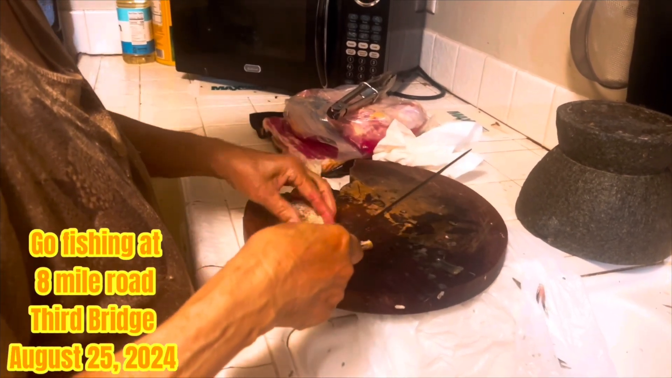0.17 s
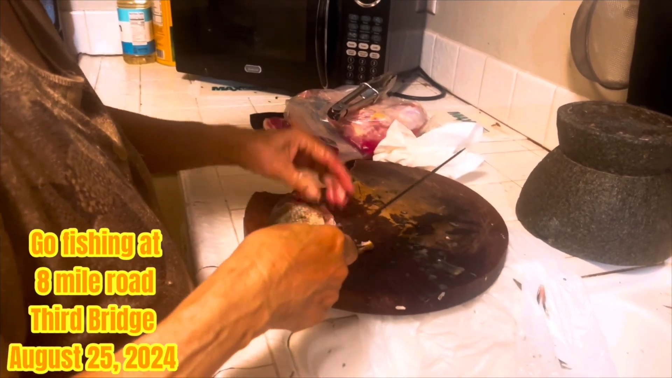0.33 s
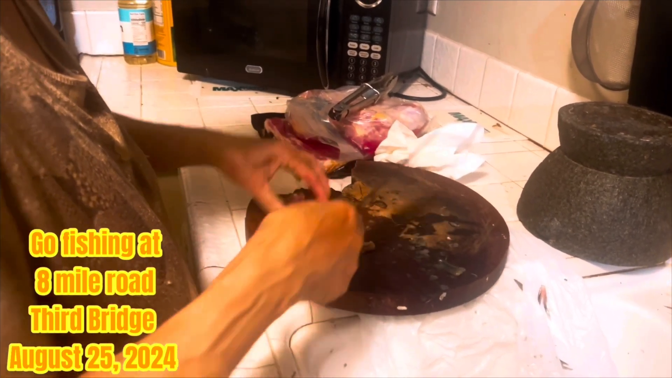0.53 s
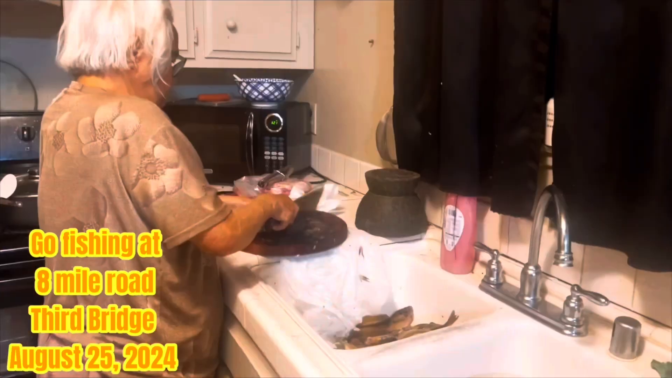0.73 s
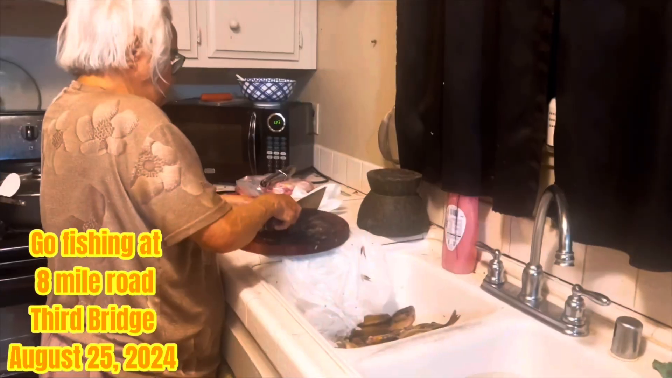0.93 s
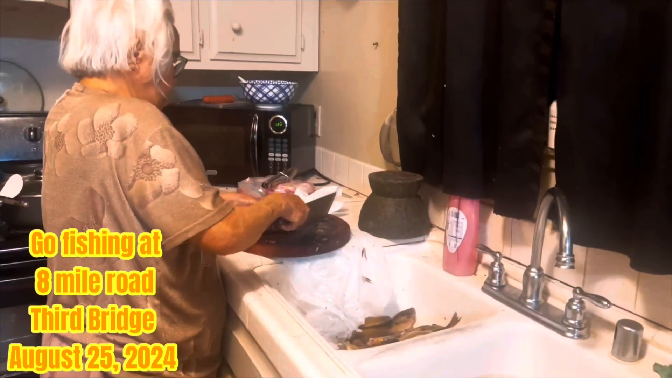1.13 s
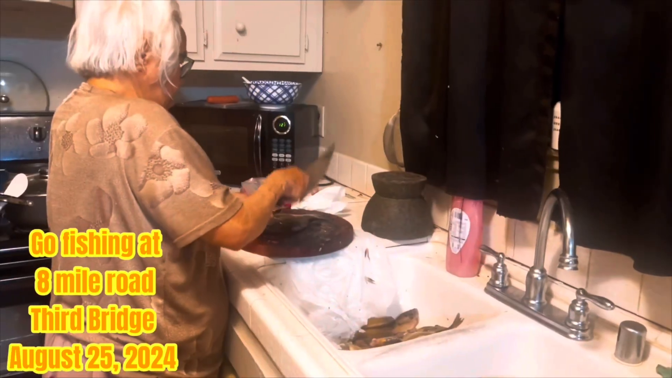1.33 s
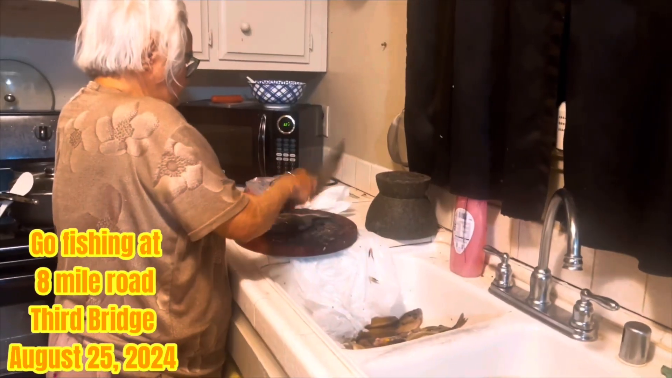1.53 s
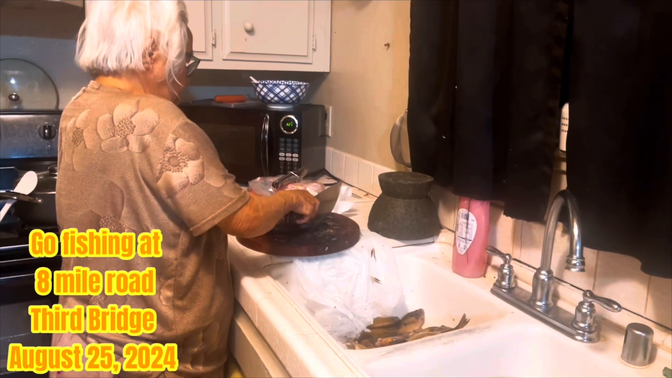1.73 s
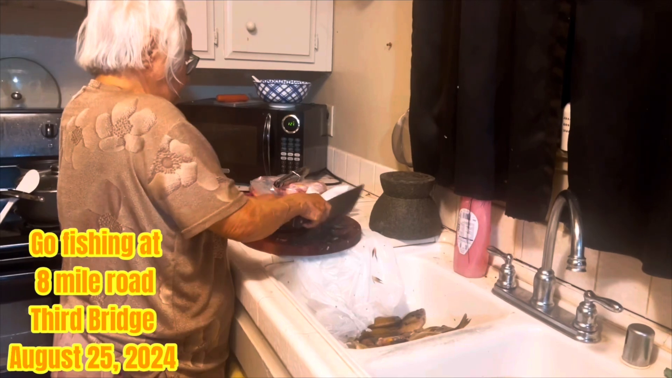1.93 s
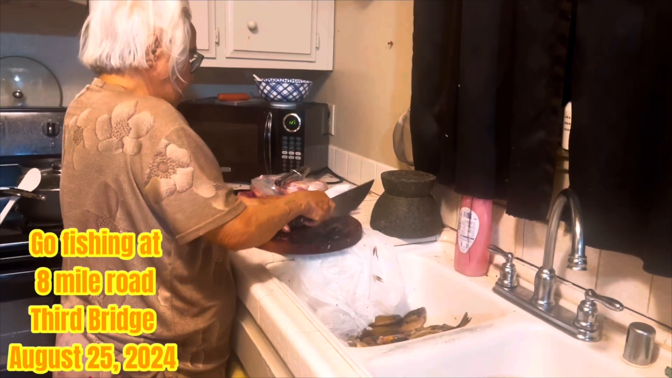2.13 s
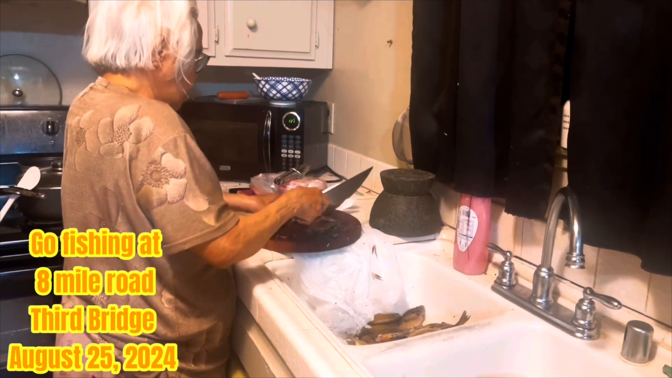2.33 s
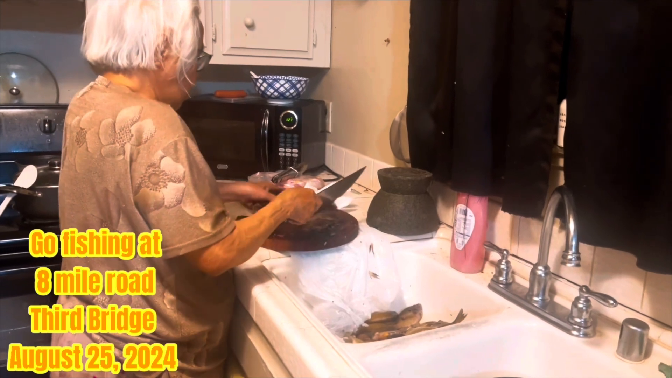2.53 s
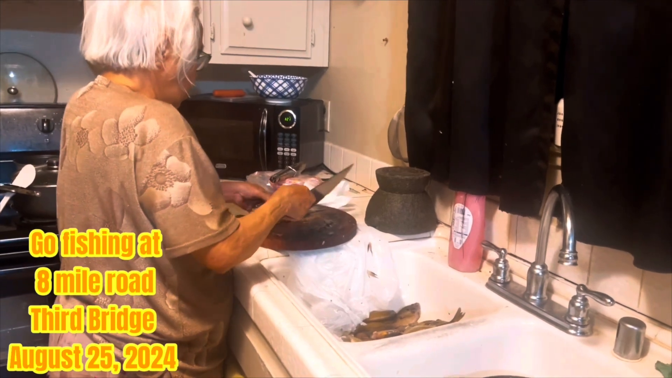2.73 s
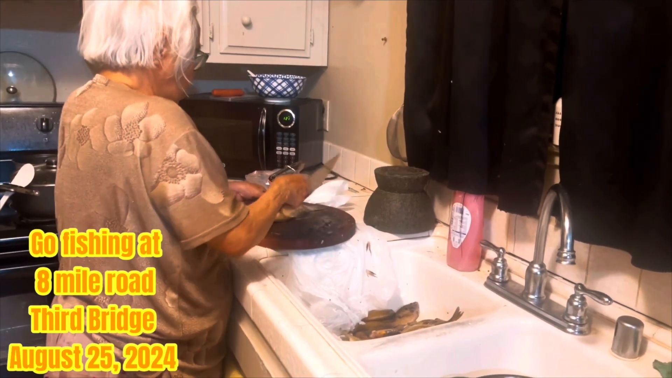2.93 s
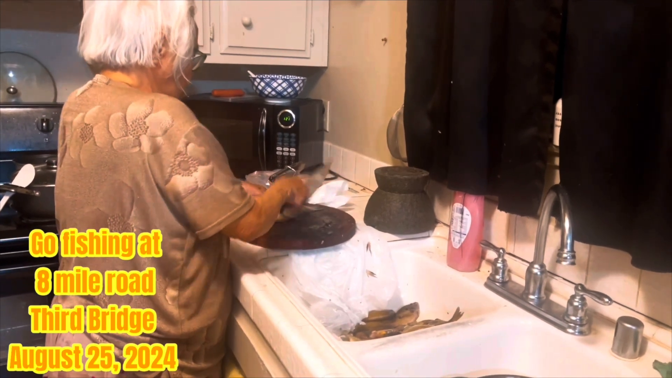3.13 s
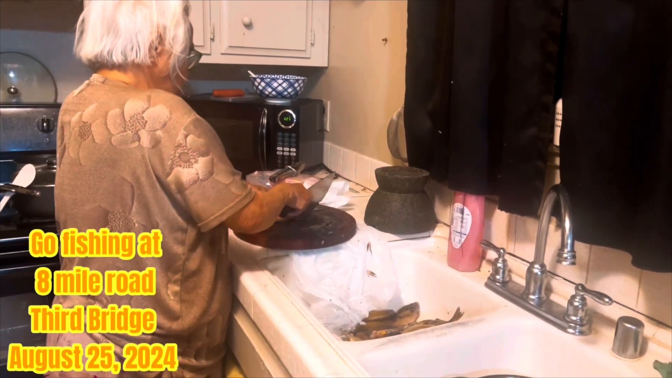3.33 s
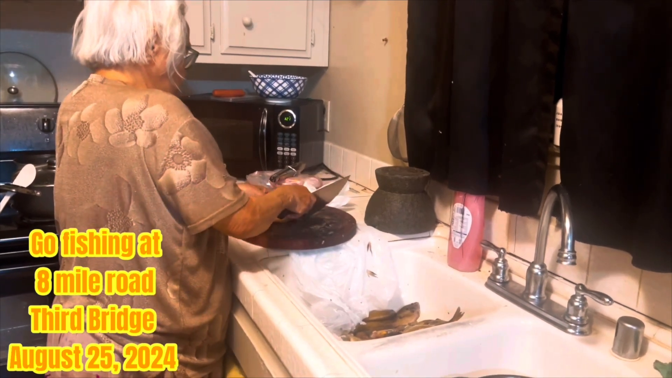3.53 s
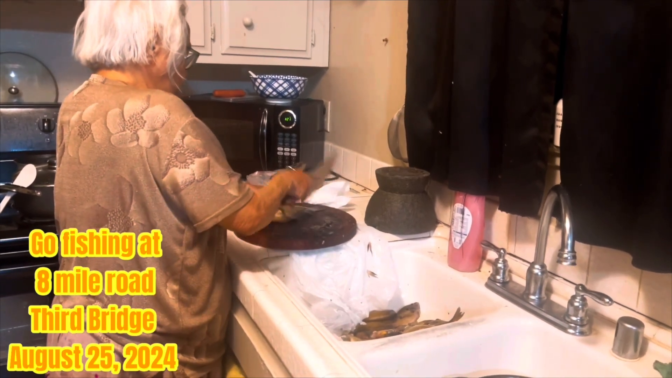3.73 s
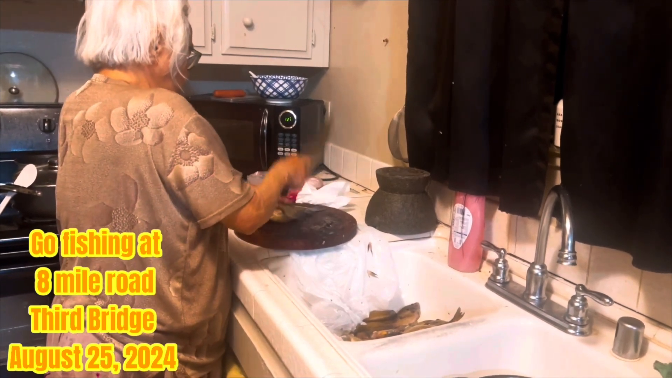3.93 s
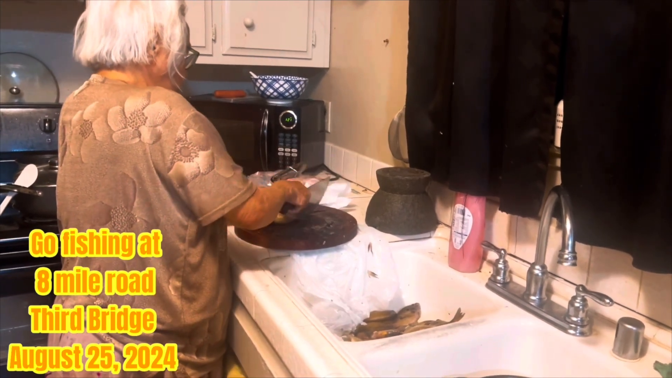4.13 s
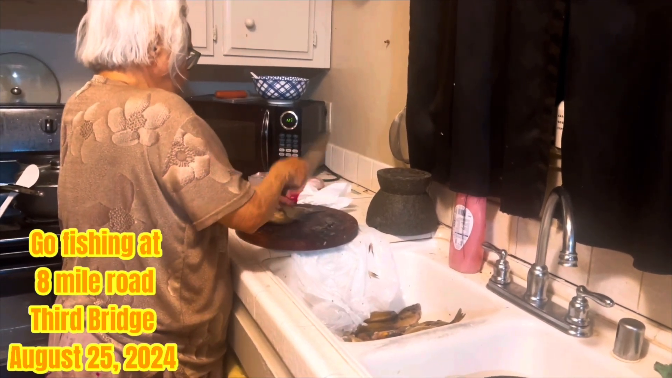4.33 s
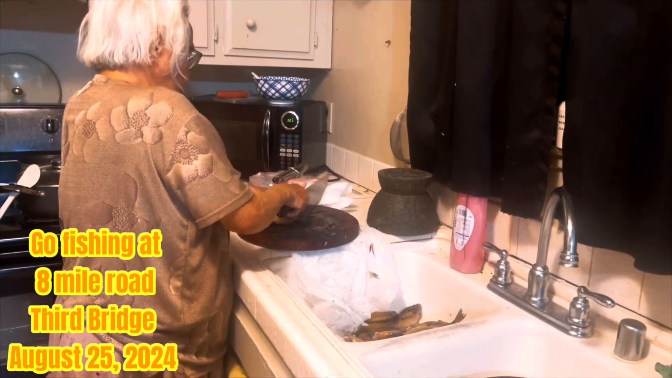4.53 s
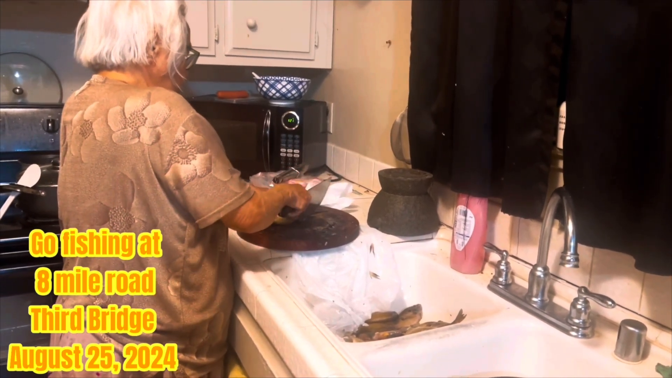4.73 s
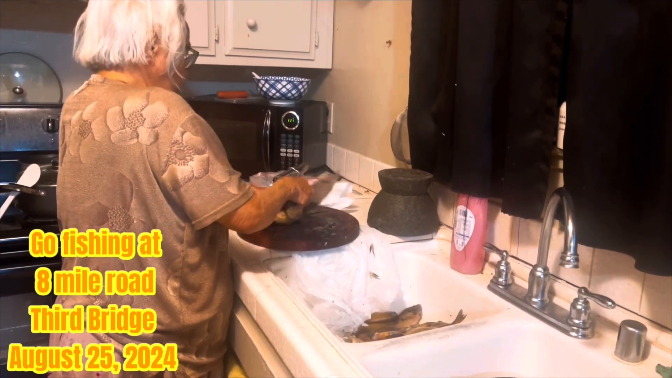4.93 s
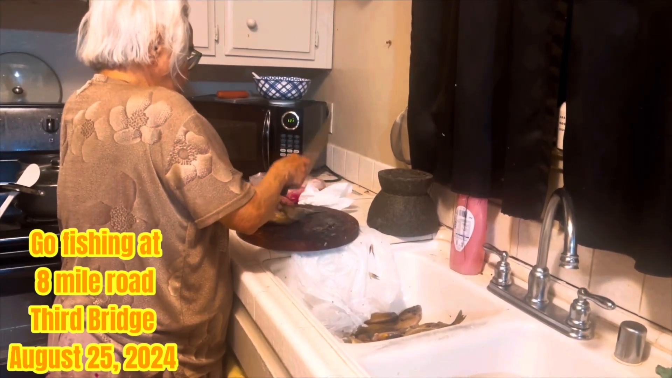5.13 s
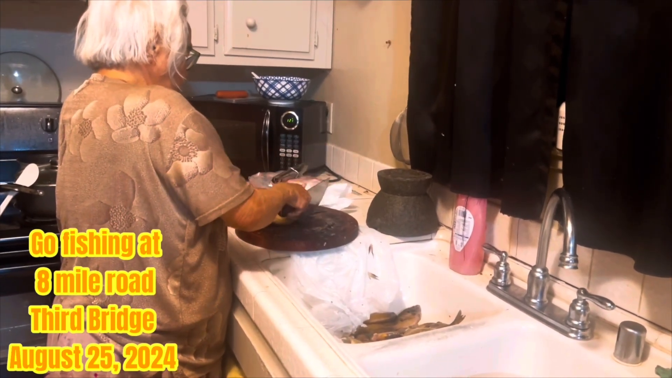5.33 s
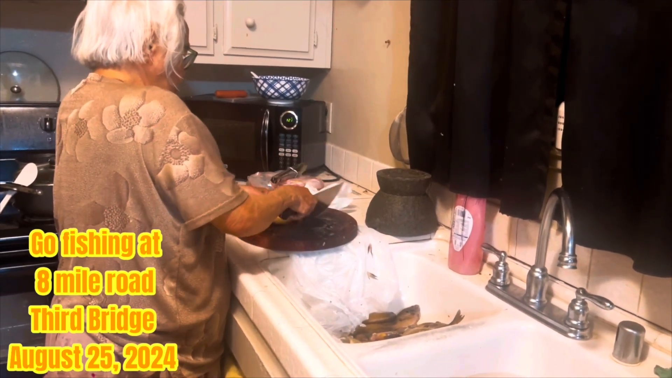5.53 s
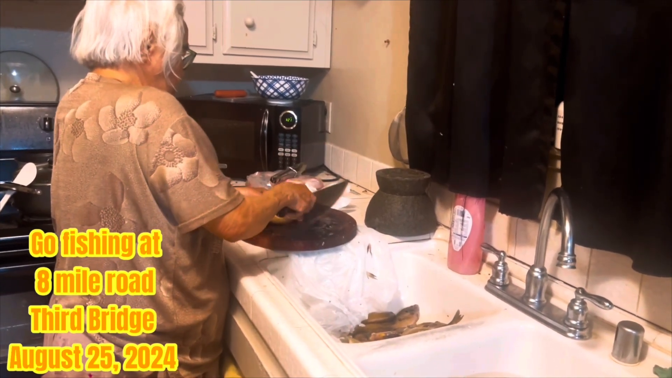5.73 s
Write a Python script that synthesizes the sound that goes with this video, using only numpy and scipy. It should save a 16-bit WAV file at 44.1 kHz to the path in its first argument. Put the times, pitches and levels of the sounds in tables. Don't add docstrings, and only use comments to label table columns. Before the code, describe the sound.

Quiet handling and a light board tap lead to a very brief dropout. Six irregular chops follow, two of them soft and the rest sharp and loud, the last loudest. Each is a short bony crunch and dry wooden knock with a low counter thump and sink resonance. The edge scrapes and sings, wood groans, a sleeve brushes. Near handheld pickup with dulled treble, short tiled-room reflections and low room noise.

```python
import sys
import numpy as np
from scipy import signal
from scipy.fft import rfft, irfft, next_fast_len
from scipy.io import wavfile

SR = 44100
rng = np.random.default_rng(int(sys.argv[2]) if len(sys.argv) > 2 else 0)


def volts_from_decibels(level):
    exponent = np.asarray(level, float) / 20
    return 10 ** exponent


def master_out(mix):
    frames = np.transpose(np.atleast_2d(mix))
    ceiling = np.clip(frames, -1, 1)
    pcm = np.round(ceiling * 32767).astype(np.int16)
    wavfile.write(sys.argv[1], SR, pcm)


N = 258867
T = np.arange(N) / SR

# start in seconds, peak level in dB, then counter thump, board and blade crack
# in dB relative to the peak.
CHOPS = [
    (0.761, -15, -26, -13, -23),
    (1.57, -2.5, -28.5, -16.5, -25),
    (3.153, -16.5, -14.5, -6, -15.5),
    (3.988, -2, -25, -8, -15.5),
    (4.515, -2, -25, -11.5, -20),
    (5.221, 1, -32.5, -16.5, -24),
]
# sink in dB relative to the blow, then levels in dB of
LEFTOVERS = [
    (0.5, -43.5, -58.5, -49.5, -47.5),
    (-7, -57.5, -60.5, -57, -45.5),
    (-13, -52.5, -66.5, -80, -63.5),
    (-4, -42, -57.5, -67, -69.5),
    (-2.5, -47, -60.5, -55.5, -44.5),
    (-8.5, -49, -64, -58, -43),
]
DROPOUT_S = (.730, .760)


def blows():
    # low mode in Hz, its relative level in dB,
    # high mode in Hz, its relative level in dB, t60 of the low mode in seconds.
    spots = [
        (440, -15, 1700, -11.5, 0.15),
        (560, -16, 1950, -9.5, 0.05),
        (630, -19.5, 2050, -6, 0.033),
        (819, -17, 2100, -10.5, 0.052),
        (836, -15.5, 2030, -13, 0.062),
        (834, -21.5, 2800, -12.5, 0.071),
    ]
    # frequency in Hz, level in dB per Hz.
    crack_colour = [(60, -29), (110, -4.5), (264, -1), (460, -11), (860, -3.5), (2000, -14.5),
                    (3000, -15.5), (4300, -29), (6000, -26.5), (9500, -27.5), (11500, -25), (13000, -34.5),
                    (15800, -63.5)]
    # frequency in Hz, level in dB, t60 in seconds.
    board_modes = [(250, 2.5, 0.14), (355, -7, .08), (417, -6, 0.32), (578, -7.5, 0.21), (663, -4, 0.09),
                   (868, 2, 0.12), (1000, -0.5, .08), (1060, -9, 0.024), (1200, -7, 0.047),
                   (1264, -8.5, .05), (1553, -2.5, .05), (1970, -8.5, 0.013), (2450, -9.5, .04),
                   (2690, -13, 0.031)]
    # frequency in Hz, level in dB, t60 in seconds.
    counter_modes = [(68.8, -1.5, 0.57), (73, -7, 0.4), (79, -5.5, .2), (102.6, -6.5, 0.1), (149, -6, .2)]
    # frequency in Hz, level in dB, t60 in seconds.
    sink_modes = [(204, -39.5, 0.42), (461.5, -46.5, 0.76), (575, -41, 1.5), (693, -44, 0.33),
                  (889, -52.5, 3.1)]
    board_lag_s, blade_lag_s = 0.0051, 0.001
    detune = 0.02

    out, hum = np.zeros(N), np.zeros(N)
    freqs = np.fft.rfftfreq(4096, 1 / SR) + 1
    low, = at_hz([(700, 0.87), (1600, 0.092)], freqs)
    high, = at_hz([(4000, 0), (6500, 1)], freqs)
    late = low * np.exp(-2j * np.pi * freqs * board_lag_s)
    late = late + (1 - low) * np.exp(-2j * np.pi * freqs * blade_lag_s)
    lag = round(board_lag_s * SR)
    for chop, spot, leftover in zip(CHOPS, spots, LEFTOVERS):
        s, peak_db, thump_db, board_db, crack_db = chop
        low_hz, low_db, high_hz, high_db, spot_t60 = spot
        sink_db = leftover[0]
        i = round(s * SR)
        t, force = T[:min(N - i, 2 * SR)], crunch()
        span = slice(i, i + len(t))

        colour = at_hz(crack_colour, freqs)[0] + low * (board_db + 8.0) + high * (crack_db + 18.0)
        crack = irfft(rfft(force, 4096) * volts_from_decibels(colour) * late)[:2048]
        out[i:i + 2048] += volts_from_decibels(peak_db - 2.0) * crack / np.abs(crack).max()

        rough = np.zeros(len(t))
        rough[lag:lag + 2048] = force
        out[span] += volts_from_decibels(peak_db + low_db) * ring(rough, low_hz, spot_t60)
        out[span] += volts_from_decibels(peak_db + high_db) * ring(np.roll(rough, -lag), high_hz, spot_t60 / 3)
        for hz, db, t60 in board_modes:
            level = volts_from_decibels(peak_db + board_db + db - 12.5 + 2.5 * rng.standard_normal())
            out[span] += level * ring(rough, hz * (1 + detune * rng.standard_normal()), t60)

        push = t * np.exp(-t / 0.004)
        for hz, db, t60 in counter_modes:
            out[span] += volts_from_decibels(peak_db + thump_db + db + 16.5) * ring(push / push.sum(), hz, t60)

        sink_onset = 1 - np.exp(-t / 0.033)
        for hz, db, t60 in sink_modes:
            level = volts_from_decibels(peak_db + sink_db + db + 1.2 * rng.standard_normal())
            hum[span] += level * ring(rough, hz, t60) * sink_onset
    return out, hum * volts_from_decibels(2.5 * drift(25))


def crunch():
    rise_s, contact_s = 0.00087, 0.0045
    shape = (1 - np.exp(-T[:2048] / rise_s)) * np.exp(-T[:2048] / contact_s)
    force = rng.standard_normal(2048)
    for _ in range(6):
        lines = rfft(force * shape ** 0.3)
        force = irfft(lines / (np.abs(lines) + 1e-9))
    force = force * shape ** 0.17
    return force / np.sqrt(np.sum(force ** 2))


def settling(index, fall_db_per_s):
    peak_after_s, rise_db_per_s = 0.13, 120
    return sum((T > chop[0]) * swell(chop[0] + peak_after_s, 0, leftover[index], rise_db_per_s, fall_db_per_s)
               for chop, leftover in zip(CHOPS, LEFTOVERS))


def drags(bank):
    # start in seconds, length in seconds, then levels in dB of
    strokes = [
        (.945, .05, -72, -47, -63),
        (1.046, 0.041, -49.5, -58, -57),
        (1.784, 0.038, -73.5, -50, -55.5),
        (1.895, .03, -62.5, -61, -70),
        (4.817, 0.021, -52.5, -73.5, -89),
        (5.44, 0.032, -54, -59, -63.5),
        (5.491, 0.12, -52, -60.5, -52.5),
    ]
    # frequency in Hz, width in Hz, level in dB.
    blade_modes = [(2640, 90, -9), (3620, 30, -18), (4680, 30, -5), (5780, 45, -6), (7080, 45, -4),
                   (7420, 40, -10), (8020, 30, -6), (8500, 45, 0), (8770, 30, -5), (9680, 35, -5),
                   (11200, 80, -6), (12000, 45, -14), (12400, 35, -12)]
    # frequency in Hz, level in dB per Hz.
    groan_colour = [(80, -22), (200, -8), (420, 0), (620, -7), (1500, -30), (13000, -60)]
    # frequency in Hz, level in dB per Hz.
    rasp_colour = [(300, -27), (900, 4), (1500, 1), (2600, -5.5), (5000, -20), (13000, -34)]
    # frequency in Hz, level in dB per Hz.
    wipe_colour = [(59, -39), (100, -5.5), (477, -3), (754, -11), (845, 6), (1100, -18.5), (1440, -12),
                   (9500, -24.5), (12400, -42), (20900, -120)]
    song_rise, song_fall, wood_rise, wood_fall = 600, 311, 302.5, 350
    creep_db, creep_rise = -12.5, 111.5

    song = 0
    groan = settling(index=3, fall_db_per_s=59.5)
    rasp = settling(index=4, fall_db_per_s=110)
    for s, length, song_db, groan_db, rasp_db in strokes:
        song = song + swell(s, length, song_db, song_rise, song_fall)
        song = song + swell(s, 0, song_db + creep_db, creep_rise, song_fall)
        groan = groan + swell(s, length, groan_db, wood_rise, wood_fall)
        rasp = rasp + swell(s, length, rasp_db, wood_rise, wood_fall)
    wipe = swell(2.63, 0, -54, rise_db_per_s=424, fall_db_per_s=374)

    hits = rng.random(N) < 4000 / SR
    grit = hits * volts_from_decibels(2.4 * rng.exponential(1, N).clip(0, 5)) * rng.choice([-1, 1], N)
    modes = sum(volts_from_decibels(db + 2.0 * drift(15)) * rms_one(ring(grit, hz, 2.0 / width))
                for hz, width, db in blade_modes)
    sung = song * rms_one(rms_one(modes) + 0.2 * rms_one(band(grit, 7500, 1.5, 1.3)))
    wood = groan * noise(bank, groan_colour, 2.5, 0.8) + rasp * noise(bank, rasp_colour, 2.5, 0.8)
    return sung + wood + wipe * noise(bank, wipe_colour, 2.3, 0.93)


def ticks():
    # start in seconds, peak level in dB, centre in Hz, t60 in seconds,
    # half width in octaves.
    touches = [(0.057, -49.5, 10000, 0.041, .5), (0.691, -60, 1490, 0.22, 0.89),
               (1.086, -32.5, 7400, 0.063, 0.26), (1.479, -58, 6000, 0.032, 0.55),
               (2.362, -59.5, 8800, 0.12, 0.17), (2.363, -65.5, 2980, 0.15, .8),
               (2.525, -60.5, 9000, 0.2, .4), (2.86, -61, 7010, 0.24, 0.057), (2.927, -65, 2000, 0.57, .8),
               (2.957, -67, 8500, 0.28, 0.28), (2.578, -50, 1896, .08, .5), (3.46, -60.5, 2600, 0.4, 0.59),
               (3.05, -49, 730, 0.33, 0.2), (3.145, -33.5, 4000, 0.15, 2.77), (3.33, -54, 3500, 0.087, 1),
               (3.648, -44.5, 3880, 0.182, 0.338), (3.648, -57, 8010, 0.067, 0.44),
               (3.649, -51, 1827, 0.16, .6), (4.356, -47, 11590, 0.11, 0.15),
               (4.359, -59, 7200, 0.11, 0.52), (4.8, -50.5, 6100, .05, 0.92), (5.746, -57.5, 9000, 0.2, .6)]
    # start in seconds, frequency in Hz, level in dB, t60 in seconds.
    small_rings = [
        (.667, 910, -44, 0.023),
        (.676, 66.7, -37.5, 0.11),
        (1.06, 889, -59, 1.2),
        (1.1, 1712, -60.5, .35),
        (1.9, 889, -60, 1.1),
        (4.82, 889, -58.5, 1.),
        (4.82, 575, -60, 1.2),
        (5.54, 3600, -49.5, 0.27),
        (5.625, 3620, -57, 0.19),
        (5.64, 889, -79, 0.73),
    ]
    out = np.zeros(N)
    for s, db, hz, t60, octaves in touches:
        i = round(s * SR)
        t = T[:min(16384, N - i)]
        puff = rng.standard_normal(len(t)) * volts_from_decibels(-60 * t / t60) * (1 - np.exp(-t / 0.002))
        reach = 2 ** abs(octaves)
        out[i:i + len(t)] += volts_from_decibels(db) * band(puff, hz, reach, reach)
    for s, hz, db, t60 in small_rings:
        t = np.maximum(T - s, 0)
        level = volts_from_decibels(db - 60 * t / t60 + 2.5 * drift(30))
        out += level * np.sin(2 * np.pi * hz * t) * (1 - np.exp(-30 * t / t60))
    return out


def paper_rustle(bank):
    # start in seconds, length in seconds, level in dB.
    rustles = [
        (0.0, 0.011, -59),
        (0.196, 0.079, -57),
    ]
    # frequency in Hz, level in dB per Hz.
    paper_colour = [(1180, -54), (2000, -35), (2610, -24), (4240, 8), (5670, 5.5), (9070, -8), (10300, -22),
                    (12000, -20), (13000, -50)]
    gain = sum(swell(*row, rise_db_per_s=600, fall_db_per_s=205) for row in rustles)
    return gain * noise(bank, paper_colour, 1.2, 0.9)


def counter_rumble(bank):
    # start in seconds, length in seconds, level in dB.
    leans = [
        (.62, .1, -63.5),
        (1.15, 0.28, -54.5),
        (1.8, 0.36, -56),
        (3.75, 0.23, -71),
        (4.8, .3, -57),
        (5.45, 0.38, -55.5),
    ]
    # frequency in Hz, level in dB per Hz.
    rumble_colour = [(15, -39), (25, -25), (57, 2), (81, 3), (151, -9), (267, -11), (316, -13),
                     (700, -36.5), (910, -54), (1540, -120)]
    floor_db = (-63.5, -66)
    shake = settling(index=1, fall_db_per_s=49)
    shake = shake + sum(swell(*row, rise_db_per_s=82, fall_db_per_s=120.5) for row in leans)
    floor = volts_from_decibels(np.array(floor_db))[after_dropout()]
    return np.hypot(floor, shake) * noise(bank, rumble_colour, 0.4, 0.92) * flicker(2.5, 30)


def cloth_hiss(bank):
    # start in seconds, length in seconds, level in dB.
    sleeve_moves = [
        (2.93, .2, -75),
        (3.35, .6, -73),
        (4.2, 0.34, -67.5),
        (4.85, 0.17, -69.5),
    ]
    # frequency in Hz, level in dB per Hz.
    hiss_colour = [(290, -29.5), (500, 1.5), (1060, -5), (3020, -8.5), (4250, -21), (8640, -16),
                   (10200, -30), (11300, -16), (13000, -31)]
    floor_db = (-71, -76)
    cloth = settling(index=2, fall_db_per_s=125)
    cloth = cloth + sum(swell(*row, rise_db_per_s=100, fall_db_per_s=80) for row in sleeve_moves)
    floor = volts_from_decibels(np.array(floor_db))[after_dropout()]
    return np.hypot(floor, cloth) * noise(bank, hiss_colour, 1.8, 0.5) * flicker(0.83, 40)


def after_dropout():
    return (T > DROPOUT_S[0]).astype(int)


def kitchen():
    # frequency in Hz, early t60 in seconds, late t60 in seconds,
    # late tail in dB, left-right likeness from 0 to 1.
    decays = [(60, 0.51, 0.72, -17.5, 1), (198.8, 0.078, .8, -17.5, 0.93), (700, 0.22, 0.54, -19.5, 0.37),
              (2000, .22, 0.42, -15.5, 0.62), (5000, .27, 0.18, -25, 1), (9000, 0.24, 0.43, -29.5, 1),
              (13000, 0.23, 0.51, -29.5, 0.99)]
    t, out = T[:SR], 0
    for hz, pair in bands(SR):
        early, late, late_db, alike = at_hz(decays, hz)
        decay = volts_from_decibels(-60 * t / early) + volts_from_decibels(late_db - 60 * t / late)
        out = out + decay * spread(*pair, alike)
    out = out * (1 - np.exp(-t / 0.001))
    return out / np.sqrt(np.sum(out ** 2) / 2)


def lead_in():
    # start in seconds, end in seconds, level in dB, centre in Hz.
    clusters = [
        (1.555, 1.571, -28, 1800),
        (3.968, 3.984, -53, 2503),
        (4.501, 4.504, -29.5, 1762),
        (5.203, 5.222, -33, 1839),
    ]
    out = np.zeros(N)
    for start, end, db, hz in clusters:
        span = slice(round(start * SR), round(end * SR) + 128)
        lines = hz * 2 ** np.linspace(-0.7, 1.6, 7)[:, None] * rng.uniform(0.93, 1.07, (7, 1))
        sizes = volts_from_decibels(db - 9 * np.log2(lines / hz).clip(0) + rng.normal(0, 3, (7, 1)))
        gain = np.interp(T[span], [start, start + 0.004, end, end + 0.003], [0, 0.3, 1, 0])
        tones = np.sin(2 * np.pi * (lines * T[span] + rng.random((7, 1))))
        out[span] = gain * np.sum(sizes * tones, axis=0)
    return out


def swell(start, length, db, rise_db_per_s, fall_db_per_s):
    t = T[::8]
    rise = rise_db_per_s * np.maximum(start - t, 0)
    fall = fall_db_per_s * np.maximum(t - start - length, 0)
    return np.repeat(volts_from_decibels(db - rise - fall), 8)[:N]


def ring(x, hz, t60):
    r, w = volts_from_decibels(-60 / (t60 * SR)), 2 * np.pi * hz / SR
    return signal.lfilter([0, np.sin(w)], [1, -2 * r * np.cos(w), r * r], x + 1e-18)


def band(x, hz, below, above):
    edges = [hz / below, min(hz * above, 16000)]
    return signal.sosfilt(signal.butter(2, edges, "band", fs=SR, output="sos"), x)


def noise(bank, colour, patchy_db, alike):
    mid, side = sum(volts_from_decibels(at_hz(colour, hz)[0]) * flicker(patchy_db, 11) * pair for hz, pair in bank)
    return rms_one(spread(mid, side, alike))


def bands(count):
    edges_hz = 25 * 2 ** np.arange(0, 9.5, 0.5)
    white = rng.standard_normal((2, 2, count))
    for k, (low, high) in enumerate(zip(edges_hz, edges_hz[1:])):
        sos = signal.butter(2, [low, high], "band", fs=SR, output="sos")
        yield np.sqrt(low * high), signal.sosfilt(sos, white[k % 2])


def spread(mid, side, alike):
    alike = np.clip(alike, 0, 1)
    return np.sqrt(1 + alike) * mid + np.sqrt(1 - alike) * side * np.array([[1], [-1]])


def flicker(depth_db, rate):
    knots = int(T[-1] * rate) + 2
    return np.interp(T * rate, np.arange(knots), volts_from_decibels(depth_db * rng.standard_normal(knots)))


def drift(rate):
    knots = int(T[-1] * rate) + 2
    return np.interp(T * rate, np.arange(knots), rng.standard_normal(knots))


def at_hz(rows, hz):
    rows = np.array(rows)
    return [np.interp(np.log(hz), np.log(rows[:, 0]), c) for c in rows.T[1:]]


def rms_one(x):
    return x / np.sqrt(np.mean(x ** 2) + 1e-20)


def echo(x, response):
    return signal.fftconvolve(np.atleast_2d(x), response, axes=1)[:, :N]


def scene():
    knock, hum = blows()
    room = signal.sosfilt(signal.butter(2, 110, "high", fs=SR, output="sos"), kitchen())
    bank = list(bands(N))
    near = ticks() + drags(bank)
    direct = volts_from_decibels(5.0) * knock + hum + near
    send = volts_from_decibels(2.5) * knock + volts_from_decibels(-11.0) * near.mean(axis=0)
    floors = paper_rustle(bank) + counter_rumble(bank) + cloth_hiss(bank)
    return (direct + echo(send, room) + floors) * volts_from_decibels([[0.5], [-0.5]])


def top_cut(x):
    return signal.sosfilt(signal.butter(12, 17110, fs=SR, output="sos"), x)


def record(dry):
    # frequency in Hz, phase in turns by which right leads left.
    port_turns = [(2100, 0), (3500, -.1), (5000, -.03), (8600, -.01), (10250, .5), (12000, 1), (13700, 1.5),
                  (15400, 2)]
    size = next_fast_len(N + 512)
    turns, = at_hz(port_turns, np.fft.rfftfreq(size, 1 / SR) + 1)
    shift = np.exp(1j * np.pi * turns * np.array([[-1], [1]]))
    dry = irfft(rfft(dry, size) * shift, size)[:, :N]
    dull = signal.sosfilt(signal.butter(10, 12700, fs=SR, output="sos"), dry)
    x = dull + volts_from_decibels(-28.0) * (dry - dull)
    x = signal.sosfilt(signal.butter(3, 45, "high", fs=SR, output="sos"), x)
    x = x + lead_in()
    start, end = DROPOUT_S
    gate = np.interp(T, [start - 0.004, start, end, end + 0.001], [1, 0, 0, 1])
    return top_cut(gate * np.tanh(x / 1.32))


dry = scene()
out = record(dry)
master_out(out)
```